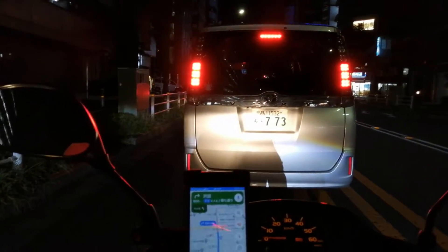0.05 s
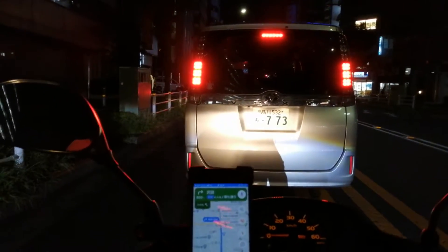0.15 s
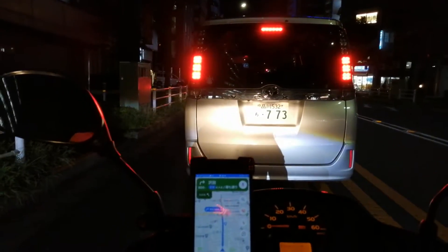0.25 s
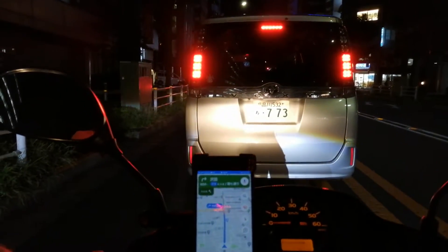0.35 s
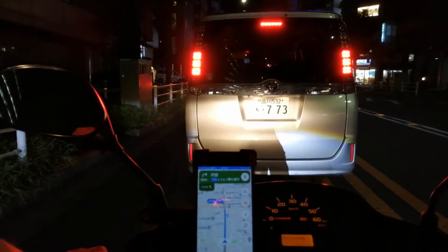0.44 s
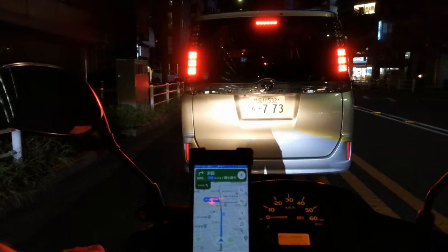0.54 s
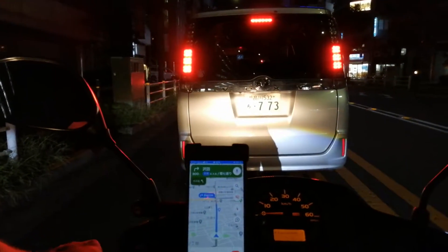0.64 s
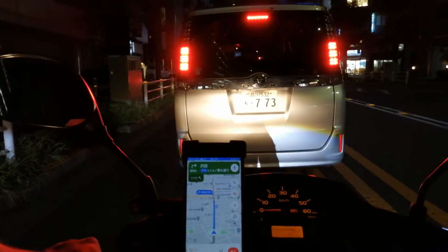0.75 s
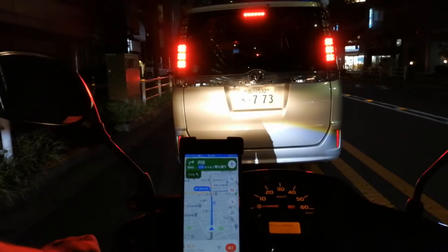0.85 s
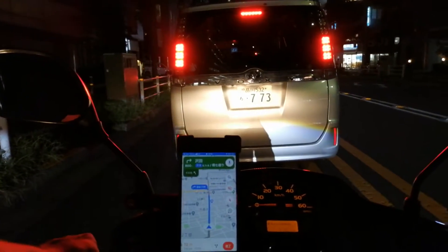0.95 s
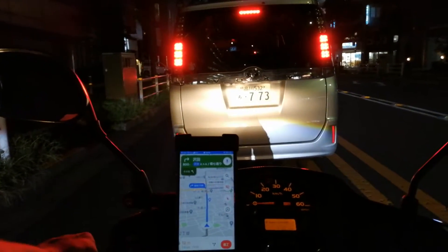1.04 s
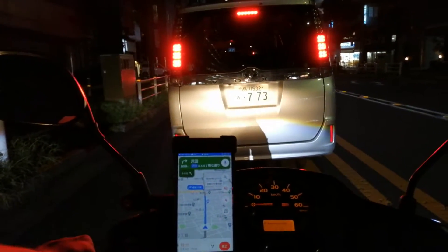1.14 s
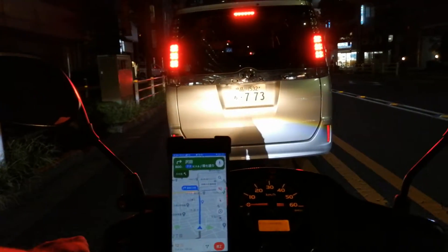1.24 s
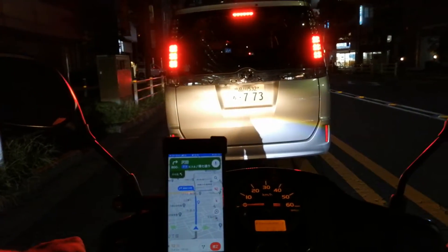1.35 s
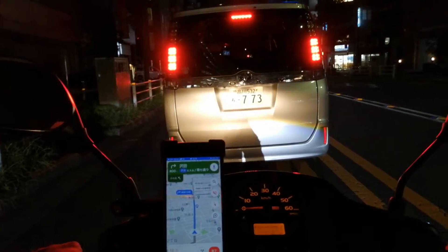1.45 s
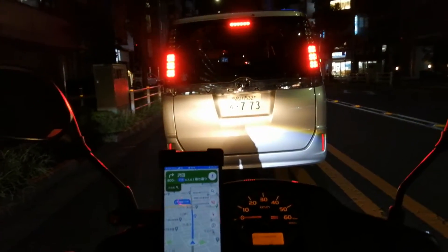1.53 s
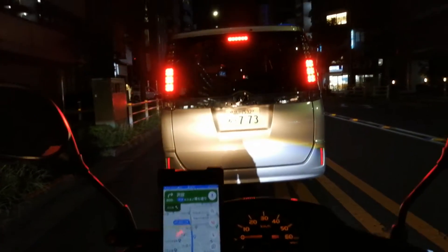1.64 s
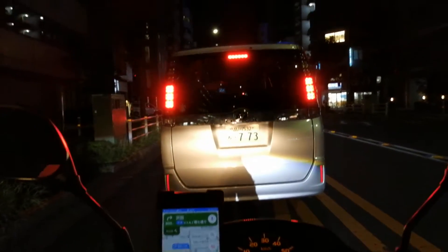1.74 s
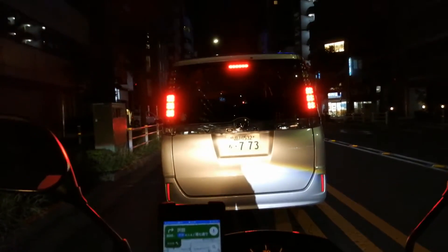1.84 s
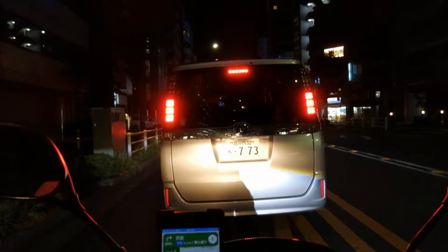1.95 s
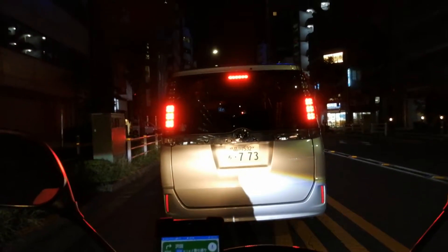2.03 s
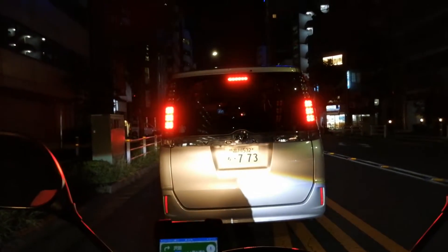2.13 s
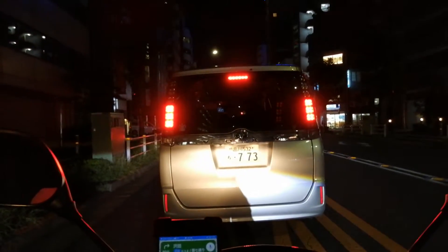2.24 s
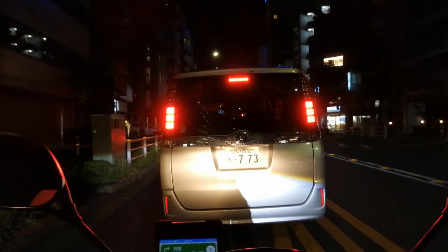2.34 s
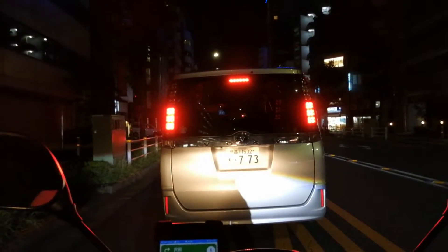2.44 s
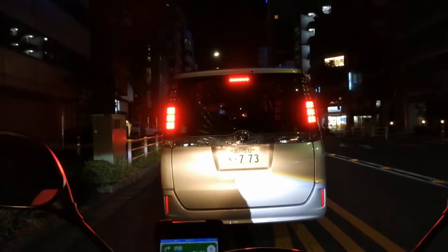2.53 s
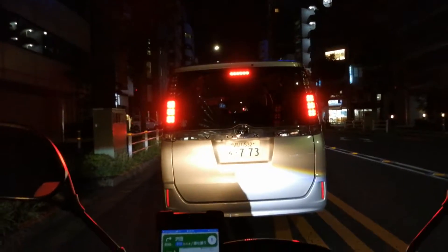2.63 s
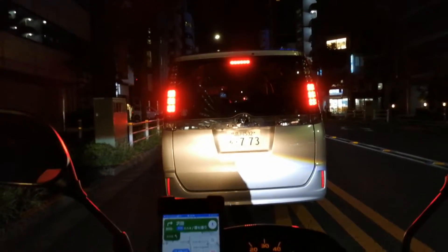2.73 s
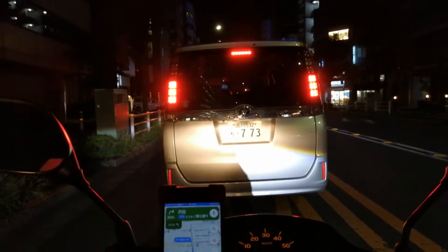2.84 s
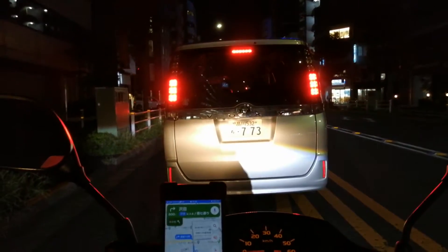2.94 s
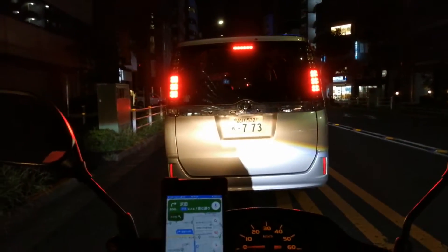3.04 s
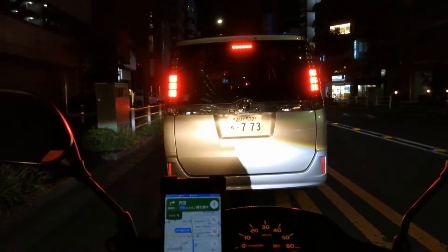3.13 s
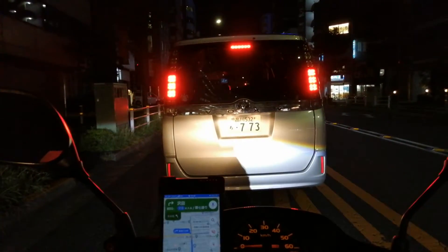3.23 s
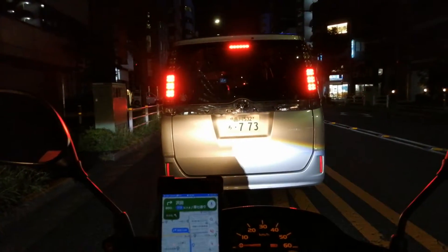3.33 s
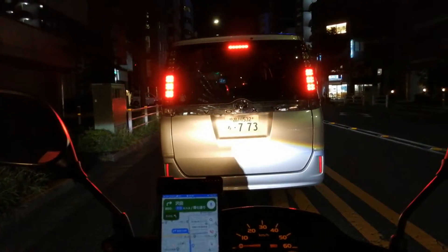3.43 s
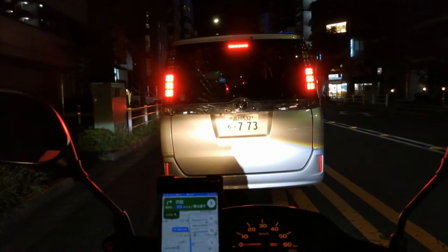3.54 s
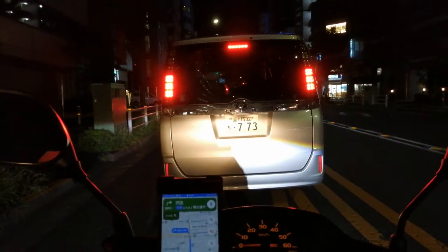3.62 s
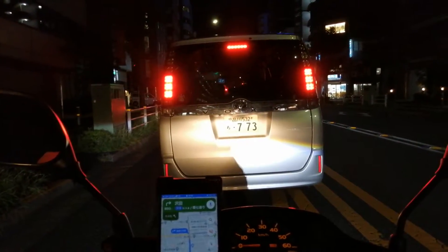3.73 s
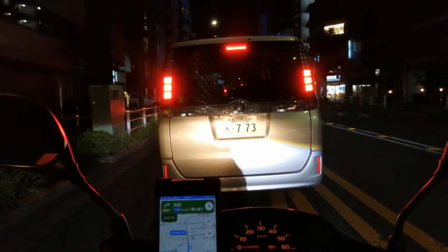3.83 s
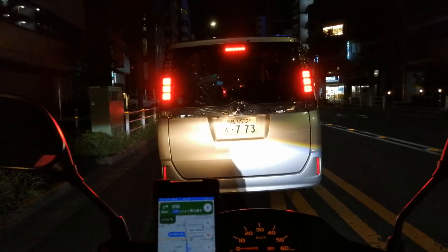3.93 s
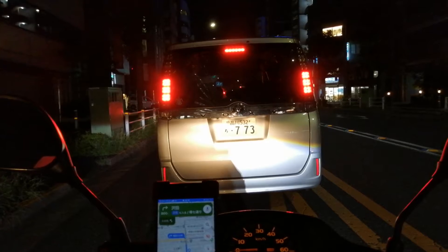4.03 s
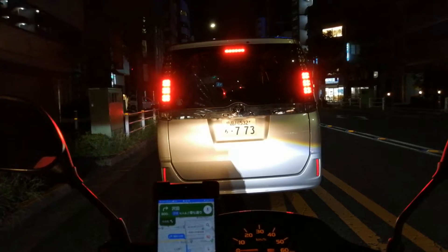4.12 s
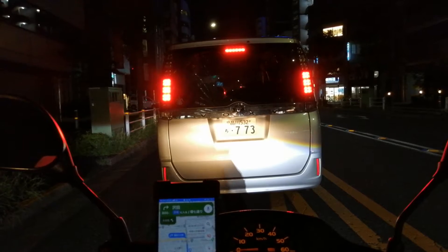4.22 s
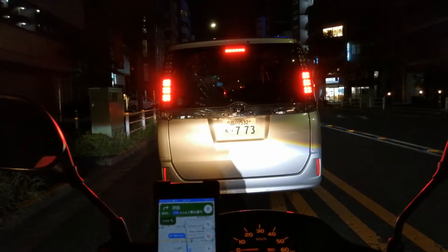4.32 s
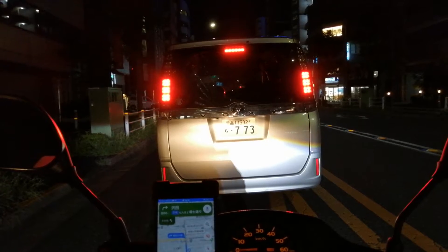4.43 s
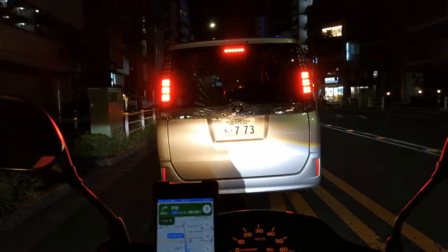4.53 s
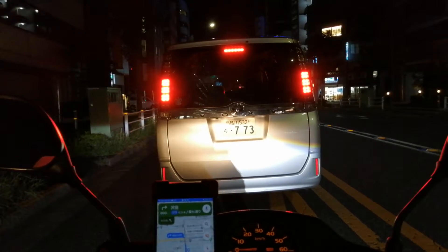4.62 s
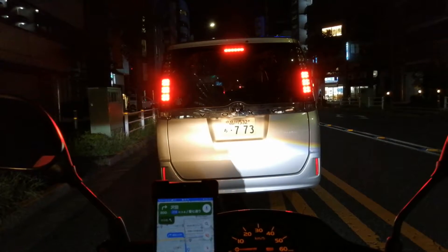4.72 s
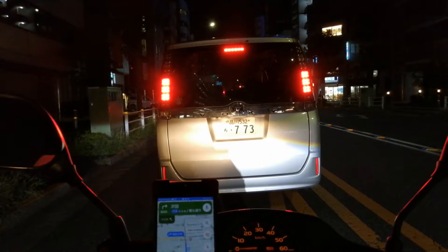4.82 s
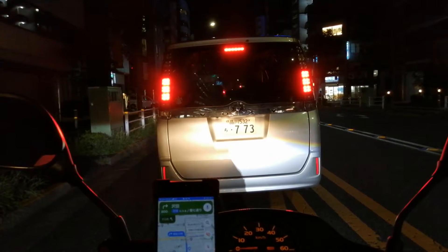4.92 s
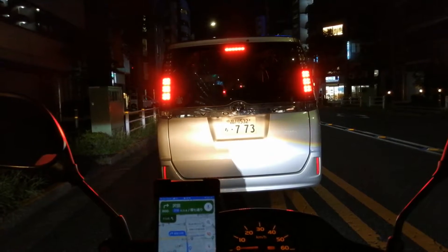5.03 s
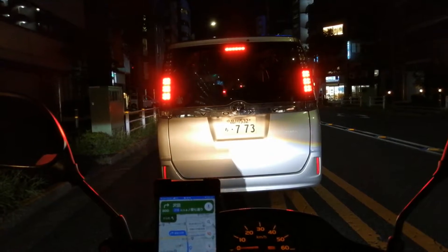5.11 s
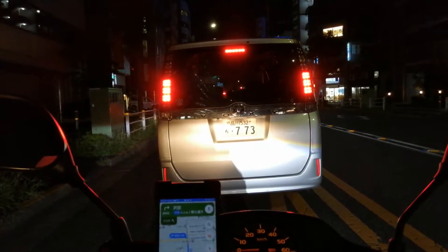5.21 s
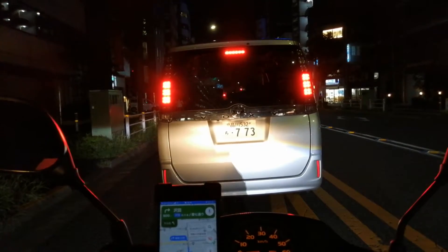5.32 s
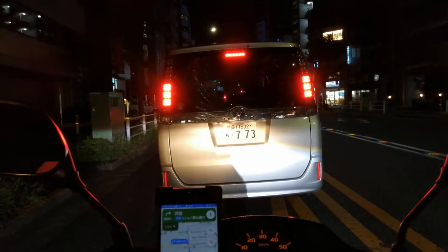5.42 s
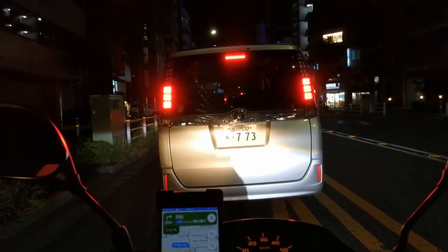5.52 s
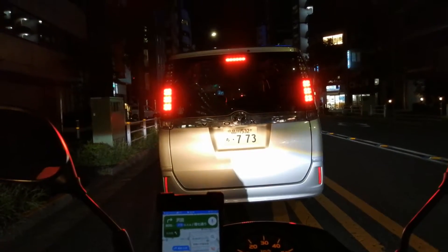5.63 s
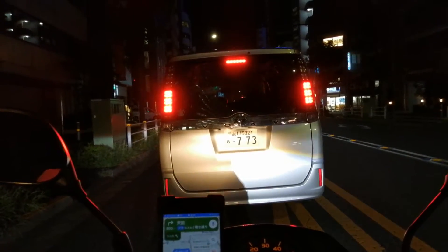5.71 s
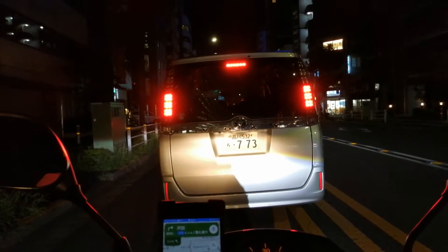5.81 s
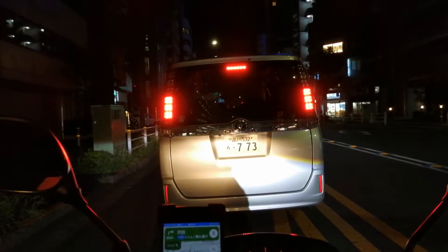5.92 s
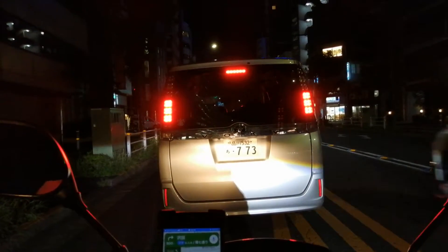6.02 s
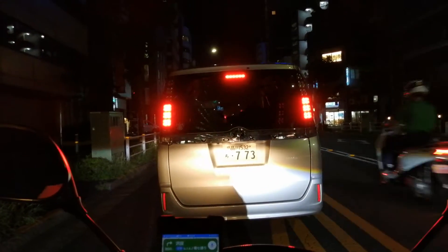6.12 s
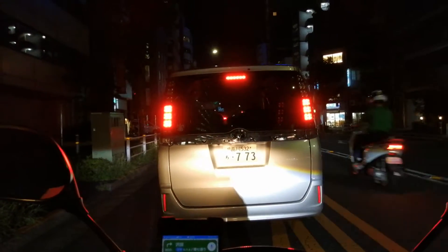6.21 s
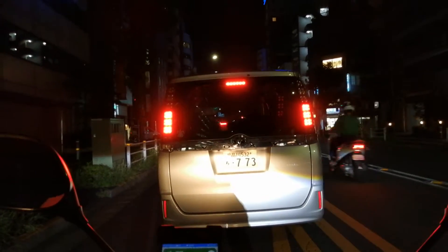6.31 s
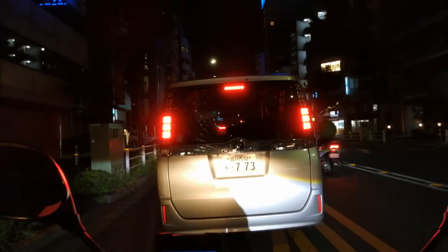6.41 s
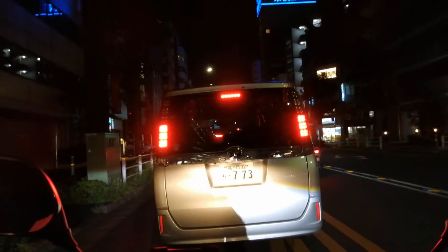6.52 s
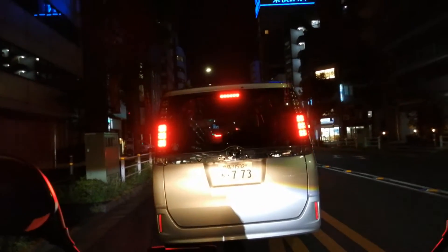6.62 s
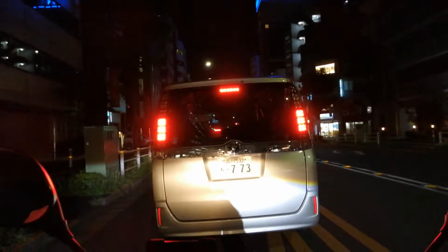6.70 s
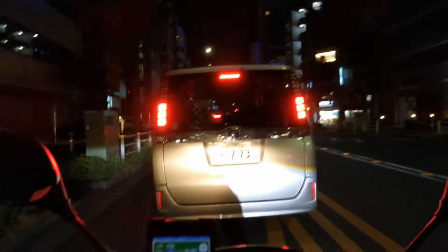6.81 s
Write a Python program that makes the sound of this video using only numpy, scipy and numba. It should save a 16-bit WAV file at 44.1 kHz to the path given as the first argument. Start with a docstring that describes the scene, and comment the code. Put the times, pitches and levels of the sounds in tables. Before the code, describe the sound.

A single-cylinder motorcycle idles with a low throb and metallic ticking while a scooter approaches, buzzes loudly past close by, and quickly fades ahead.

```python
"""A single-cylinder motorcycle idles at a red light: pulse trains for the throb, ringing noise for the case.
A scooter comes up from behind, passes close and slips behind the car in front: overtones of its
firing rate plus bands of flickering noise.
The helmet is bumped, brushed and scraped, and the idling exhaust pops: short pulses and noise bursts.
A breeze and night traffic fill the background: coloured noise."""
import sys
import numpy as np
from scipy import signal
from scipy.fft import rfft, irfft, next_fast_len
from scipy.io import wavfile
from scipy.ndimage import uniform_filter1d
from numba import njit

SR = 44100
rng = np.random.default_rng(int(sys.argv[2]) if len(sys.argv) > 2 else 0)


def store_wav(level_fs):
    """Save 16-bit WAV to argv[1]."""
    pcm = np.round(np.clip(np.atleast_2d(level_fs), -1, 1) * 32767)
    wavfile.write(sys.argv[1], SR, pcm.T.astype(np.int16))


N = 302526
TIME = np.arange(N) / SR


def undb(db):
    """Amplitude factor of a level in dB."""
    return np.exp(np.asarray(db) * (np.log(10) / 20))


def unit(x):
    """Scale to rms 1."""
    return x / np.sqrt(np.mean(x ** 2))


def noise():
    """White noise, rms near 1."""
    return rng.standard_normal(N)


def columns(table):
    """Each column of a curve after t, one value a sample."""
    s, *rest = np.transpose(table)
    return [np.interp(TIME, s, c) for c in rest]


def gate(table, fade_s):
    """1 while the curve lasts, fading to silence outside."""
    return np.clip(np.minimum(TIME - table[0][0], table[-1][0] - TIME) / fade_s + 1, 0, 1)


def bouts(rows, floor_db):
    """Steady floor gain plus a Gaussian swell per row (t/s, 1/e half-length/s, added gain/dB)."""
    return undb(floor_db) + sum(undb(db) * np.exp(-((TIME - s) / length) ** 2) for s, length, db in rows)


def late(curve, s):
    """The curve, s seconds later."""
    return np.interp(TIME - s, TIME, curve)


def walk(rate_hz):
    """Random levels held 1 / rate_hz s and slewed twice; spread near 1."""
    held = np.repeat(rng.standard_normal(int(TIME[-1] * rate_hz) + 2), repeats=16)
    slewed = uniform_filter1d(uniform_filter1d(held, size=16), size=16)
    return 1.3 * np.interp(TIME * rate_hz * 16, np.arange(len(slewed)), slewed)


def band(x, hz, width_hz):
    """Two-pole resonance, gain 1 at the centre."""
    return signal.lfilter(*signal.iirpeak(hz, hz / width_hz, SR), x)


def buzz(x, hz, width_hz):
    """Steep resonance: the same filter twice, width_hz per pass."""
    return band(band(x, hz, width_hz), hz, width_hz)


@njit
def swept(x, hz, width_hz):
    """State-variable band-pass whose centre moves."""
    y, b, l = np.empty(len(x)), 0., 0.
    for i in range(len(x)):
        g, k = np.tan(np.pi * hz[i] / SR), width_hz / hz[i]
        v = (b + g * (x[i] - l)) / (1 + g * (g + k))
        b, l, y[i] = 2 * v - b, l + 2 * g * v, k * v
    return y


def glide(x, hz, width_hz):
    """Steep moving resonance: the same filter twice, width_hz per pass."""
    return swept(swept(x, hz, 1. * width_hz), hz, 1. * width_hz)


def hiss(points, lo_hz, hi_hz, flicker_db):
    """Noise coloured by points (f/Hz, density/dB), in half-octave bands that flicker alone; rms 1."""
    size = next_fast_len(N, True)
    hz = np.maximum(np.fft.rfftfreq(size, 1 / SR), 1)
    f, db = np.transpose(points)
    tones = rfft(rng.standard_normal(size)) * undb(np.interp(np.log(hz), np.log(f), db))
    tones = tones.astype(np.complex64)
    half_octaves = (2 * np.log2(hz)).astype(np.float32)
    out = 0
    for step in np.arange(2 * np.log2(lo_hz), 2 * np.log2(hi_hz)):
        share = np.clip(1 - abs(half_octaves - np.float32(step)), 0, 1)
        out = out + undb(flicker_db * walk(9)) * irfft(tones * share, size)[:N]
    return unit(out)


def clicks(turns, scatter_db):
    """A click at each whole turn, of uneven size."""
    out = np.zeros(N)
    at = np.flatnonzero(np.diff(np.floor(turns))) + 1
    out[at] = undb(scatter_db * rng.standard_normal(N // 100)[:len(at)])
    return out


# traffic spectrum: f/Hz, relative density/dB
TRAFFIC_COLOUR = [(71, -40.5), (120, -24.5), (232, -3.5), (274, -16), (307, -4.5), (399, -15), (510, -14),
                  (1100, -23.5), (1230, -24), (1970, -30), (10700, -66), (13900, -101), (22000, -120)]
TRAFFIC_DB = -49.5


def traffic():
    """Distant traffic: coloured noise with a slowly wandering level."""
    return hiss(TRAFFIC_COLOUR, 100, 12000, 1.6) * undb(1.2 * walk(5)) * undb(TRAFFIC_DB)


# gusts: t/s, 1/e half-length/s, added gain/dB
GUST_BOUTS = [(0.5, 0.099, -33), (4.7, 0.23, -44), (6.3, 0.54, -33.5), (6.86, 0.1, -28)]
BREEZE_FLOOR_DB = -31


def breeze():
    """Wind rumbling on the microphone: low noise that swells in gusts."""
    rumble = hiss([(10, -21.5), (24, -1.5), (45, -8), (90, -21), (200, -27)], 10, 200, 3.8)
    return rumble * bouts(GUST_BOUTS, BREEZE_FLOOR_DB)


# dull bumps on the helmet and a few sharp exhaust pops of the idling engine:
# t/s, gain/dB, step/ms, fade/ms
BUMPS_AND_POPS = [(0.015, -20, 1.1, 2.7), (0.043, -27.5, 1.2, 2.3), (0.445, -25.5, 0.49, 5.8),
                  (0.479, -28, 1.3, 4.1), (0.542, -33, 1.2, 2.2), (0.5538, -20, 0.92, 2),
                  (0.571, -26.5, 0.81, 3.5), (0.604, -27, 1.5, 3.1), (0.6656, -25.5, 1.6, 2.1)]


def bumps_and_pops():
    """Helmet bumps and exhaust pops: a dip, a sudden step up and a short low shudder."""
    out, shudder = 0, unit(buzz(noise(), 236, 195))
    for s, db, step_ms, fade_ms in BUMPS_AND_POPS:
        t = TIME - s
        swing = np.tanh(1000 * t / step_ms) * np.exp(-(1000 * t / fade_ms) ** 2)
        swing += 0.092 * shudder * np.exp(-np.where(t < 0, (t / 0.01) ** 2, t / 0.022))
        out = out + undb(db) * swing
    return out


# cloth strokes: t/s, 1/e half-length/s, dull rub level/dB, crisp edge level/dB
CLOTH_STROKES = [(0.0, 0.11, -66, -66), (0.206, 0.17, -58, -86), (0.516, 0.12, -58.5, -79),
                 (0.606, .06, -66, -69.5), (0.8, 0.24, -61, -82)]


def cloth():
    """Cloth brushing the shell: a dull and a crisp noise band, swelling per stroke."""
    rub = hiss([(800, -16), (1300, -6), (2000, -5.5), (2800, -16), (3700, -12), (4300, -27)], 780, 4300, 3.3)
    edge = hiss([(3500, -2.5), (6500, -3.0), (8500, -14), (11000, -41)], 3200, 11000, 2.6)
    rows = np.array(CLOTH_STROKES)
    return rub * bouts(rows[:, [0, 1, 2]], -np.inf) + edge * bouts(rows[:, [0, 1, 3]], -np.inf)


# strap scrape: t/s, f/Hz, level/dB
STRAP_SCRAPE = [(0.4, 1500, -71), (0.44, 1450, -62), (0.49, 1340, -55), (0.57, 1290, -53), (0.6, 1600, -59),
                (0.645, 1700, -57), (0.69, 1650, -70)]


def strap():
    """A strap scrapes the shell: noise through a gliding resonance."""
    hz, db = columns(STRAP_SCRAPE)
    return unit(glide(noise(), hz, 420)) * undb(db) * gate(STRAP_SCRAPE, .02)


def overtone(turns, order, wander_db):
    """One multiple of the firing rate; echoes from cars and walls make it swell and slip."""
    slip = 0.00081 * order ** 2 * walk(11)
    return undb(wander_db * walk(7)) * np.cos(2 * np.pi * (order * turns + rng.random() + slip))


# spectrum of the scooter's noise: f/Hz, relative density/dB
WHOOSH_COLOUR = [(150, -39.5), (250, -13), (327, -5), (353, -3), (515, -7), (683, -15), (1010, -12),
                 (1340, -16), (1550, -18), (2370, -22), (2810, -24.5), (3730, -35.5), (6070, -46),
                 (7690, -48.5), (10700, -72), (13900, -103), (22000, -120)]
# body panels: f/Hz, width per filter pass/Hz, base level/dB, swell t/s, 1/e half-length/s, added gain/dB
FAIRING_RINGS = [(1040, 110, -15, 3.8, 0.098, 14.5), (1052, 58, -19.5, 5.85, .067, 4),
                 (1554, 80, -19, 2.6, .09, 17.5), (1557, 410, -15.5, 6.04, 0.04, 20.5),
                 (1650, 130, -15.5, 6.16, 0.054, 16.5), (1510, 330, -19.5, 11, 0.14, 17),
                 (1830, 310, -13, 6.42, 0.045, 6), (1862, 180, -15, 4.5, .12, 12.5),
                 (1993, 140, -16, 6.4, 0.087, 10), (2350, 100, -24.5, 4.62, 0.11, 20.5),
                 (2613, 82, -18.5, 4.66, 0.074, 16.5), (3134, 74, -16.5, 4.55, .1, 7),
                 (3980, 200, -21, 5.15, .067, 6.5), (3900, 150, -25.5, 5.2, .04, 12),
                 (4600, 180, -24.5, 6.3, .09, 14.5), (5730, 78, -23.5, 6.38, .07, 17.5),
                 (4760, 90, -23, 4.5, .067, 18)]


def rush_range(lo_hz, hi_hz):
    """One range of the scooter's rush, with the body panels that ring in it; rms 1."""
    air = hiss(WHOOSH_COLOUR, lo_hz, hi_hz, 2.05)
    out = air
    for hz, width_hz, db, s, length_s, swell_db in FAIRING_RINGS:
        if lo_hz < hz < hi_hz:
            gain = undb(db + 1.8 * walk(4.31)) * bouts([(s, length_s, swell_db)], 0)
            # a narrow ring passes little of the noise: lift it
            out = out + gain * np.sqrt(lo_hz / width_hz) * buzz(air, hz, width_hz)
    return unit(out)


def hollow(table, width_hz, rush_db):
    """Noise through a gliding resonance, riding on the level of the rush."""
    hz, db = columns(table)
    return unit(glide(noise(), hz, width_hz)) * undb(rush_db + db) * gate(table, .1)


SPIT_S, SPIT_LENGTH_S, SPIT_DB = 6.27, .16, -65.5
SPIT_DECAY_CYCLES = .16


def scooter_spit(turns):
    """One bout of treble noise that bursts and decays at every firing."""
    air = hiss([(6000, -3), (9000, 0), (11000, -14), (14500, -30)], 6000, 14500, 1.5)
    spit = np.exp(-(turns % 1) / SPIT_DECAY_CYCLES) * undb(3 * walk(40)) * air
    return unit(spit) * bouts([(SPIT_S, SPIT_LENGTH_S, SPIT_DB)], -np.inf)


# rush, from tyres over belt and gas to air:
# low f/Hz, high f/Hz, offset from the rush level/dB, share following the treble/1, delay/s
RUSH_RANGES = [(653.1, 1300, -1, 0.06, -0.056), (1310, 2300, -4, 0.12, 0.029),
               (2310, 4300, -4.5, 0.36, -0.015), (4170, 7000, 1, 1, -0.015),
               (6900, 13000, -6.5, 1.08, -.01)]
# hollow note that glides as the echoes shift: t/s, f/Hz, level over the rush/dB
HOLLOW_NOTE = [(3.95, 1000, -12), (4.1, 875, 7.5), (4.25, 590, 7), (4.33, 917, -3), (4.5, 1013, -2.5),
               (4.75, 1050, -5.5), (4.85, 885, -20), (5.15, 1040, -2), (5.4, 914, -12.5), (5.55, 792, -0.5),
               (5.7, 1110, -6.5), (5.98, 1283, -7.5), (6.07, 1070, -6), (6.17, 965, -3.5), (6.3, 935, -8.5),
               (6.48, 1050, -5), (6.7, 1004, -23)]
# brighter hollow note: t/s, f/Hz, level over the rush/dB
BRIGHT_NOTE = [(4.3, 2980, -25), (4.9, 3110, -28), (5.2, 3040, -21.5), (5.6, 3130, -29), (5.8, 3060, -16),
               (5.87, 3160, -10.5), (5.97, 2980, -17), (6.04, 2950, -24.5), (6.1, 2720, -38),
               (6.17, 2700, -14), (6.3, 2830, -15.5), (6.4, 2830, -25), (6.6, 2500, -15)]
HOLLOW_WIDTH_HZ, BRIGHT_WIDTH_HZ = 227, 350  # per filter pass


def scooter_rush(turns, rush_db, treble_db):
    """Tyres, belt, gas and air: grainy noise with a slight throb at the firing rate."""
    rush = 0
    for lo_hz, hi_hz, db, share, delay_s in RUSH_RANGES:
        level_db = db + late(rush_db + share * (treble_db - rush_db), delay_s)
        rush = rush + rush_range(lo_hz, hi_hz) * undb(level_db)
    rush = rush + hollow(HOLLOW_NOTE, HOLLOW_WIDTH_HZ, rush_db)
    rush = rush + hollow(BRIGHT_NOTE, BRIGHT_WIDTH_HZ, rush_db)
    sputter = undb(0.83 * walk(70) + 0.5 * walk(4.8))
    throb = 1 + 0.1 * np.cos(2 * np.pi * turns)
    return (rush * sputter + scooter_spit(turns)) * throb


# drone: t/s, rms level/dB of the 2nd, 3rd, 4th, 5th and 6th multiple of the firing rate
DRONE_LEVELS = [(4.8, -51, -50, -66, -62, -67), (5.05, -39, -38.5, -52, -57, -59),
                (5.28, -34.5, -33.5, -39.5, -52, -54), (5.42, -38, -44, -52, -55, -58),
                (5.52, -37.5, -32.5, -49.5, -41, -47), (5.76, -30.5, -33.5, -44, -40, -43),
                (6.0, -27, -23.5, -27, -26.5, -25.5), (6.2, -27.5, -35.5, -25.5, -31.5, -34),
                (6.46, -37.5, -44, -32.5, -46, -48), (6.6, -41, -49, -50, -53, -50)]


def scooter_drone(turns):
    """Low drone, heard only near by: the lowest overtones of the firing rate."""
    levels = enumerate(columns(DRONE_LEVELS), start=2)
    drone = sum(np.sqrt(2) * undb(db) * overtone(turns, order, 1.3) for order, db in levels)
    return drone * gate(DRONE_LEVELS, .1)


# muffler response: f/Hz, gain/dB
MUFFLER_GAIN = [(285, -9.5), (330, -1), (400, -3.5), (460, -7.5), (530, -5), (640, -9.5), (800, -15),
                (1000, -16), (1250, -20.5)]
# lifts by echoes from road and cars: t/s, f/Hz, lift/dB, f/Hz, lift/dB, f/Hz, lift/dB
ECHO_LIFTS = [(2.9, 378, -1.5, 502, 6.5, 1010, -4.5), (3.05, 363, -3, 510, 13, 997, -1.5),
              (3.11, 357, 15.5, 537, 5, 1003, 1), (3.18, 278, 17.5, 530, -2.5, 1007, -1),
              (3.27, 405, 8, 498, 17.5, 1000, 0.5), (3.33, 407, -3.5, 534, 12.5, 996, 1.5),
              (3.43, 357, 1, 490, 17, 1003, -0.5), (3.5, 326, 18.5, 505, -3, 1003, 1),
              (3.62, 403, 5.5, 492, 6, 1000, 0), (3.75, 337, 11.5, 512, 4, 1013, 1.5),
              (4.1, 345, 22, 518, 1.5, 900, 4.5), (4.3, 375, 14, 514, 3, 966, 0.5),
              (4.5, 358, 10, 496, -8.5, 1050, 18.5), (4.7, 379, 10, 507, -2, 1076, 6.5),
              (4.85, 411, 16, 513, 4, 886, 2), (5.0, 396, 9.5, 516, 6.5, 893, -3),
              (5.15, 357, 10, 536, 12.5, 1040, 9.5), (5.36, 384, 14.5, 517, 12, 897, -4),
              (5.5, 405, -1, 504, 5.5, 813, 6), (5.66, 353, -2, 500, 10, 803, 12),
              (5.72, 392, 11.5, 577, 14.5, 806, 7.5), (5.77, 359, 14.5, 545, 7.5, 790, 1),
              (5.83, 389, 14.5, 535, 12.5, 778, 4.5), (5.96, 379, 11.5, 540, 14.5, 844, 5),
              (6.05, 319, 12, 481, 6.5, 785, 4.5), (6.14, 315, 14, 462, 13, 640, 5.5),
              (6.22, 307, 14.5, 454, 13, 640, 14.5), (6.42, 309, 13, 454, 6.5, 624, 11),
              (6.55, 324, 7, 450, -4, 624, -3)]
# notes that clear and blur: t/s, gain of the notes ahead of the exhaust's noise/dB
NOTE_CLARITY = [(2.9, -2.5), (3.55, -2), (4.2, -3), (4.4, 2.5), (4.75, -3), (5.3, -2.5), (5.5, -3.5),
                (5.7, 0), (6.45, -1.5), (6.6, -12)]


def scooter_exhaust(turns, firing_hz):
    """Even firings sing through the muffler: overtones shaped by it and by echoes, plus noise; rms 1."""
    lifts = columns(ECHO_LIFTS)
    f, db = np.transpose(MUFFLER_GAIN)
    notes, power = 0, 0
    for order in range(6, 26):
        hz = order * firing_hz
        lift_db = sum(up_db * np.exp(-((hz - loud_hz) / 38) ** 2)
                      for loud_hz, up_db in zip(lifts[::2], lifts[1::2]))
        gain = undb(np.interp(np.log(hz), np.log(f), db) + lift_db)
        notes = notes + gain * overtone(turns, order, 2.3)
        power = power + gain ** 2 / 2
    notes = notes / np.sqrt(power) * undb(columns(NOTE_CLARITY)[0])
    return unit(notes + 0.55 * hiss(WHOOSH_COLOUR, 250, 650, 1.5))


def scooter_tyres():
    """Low tyre rumble, plain noise that fades in as the scooter nears."""
    rumble = hiss([(60, -2.0), (100, -1.5), (270, -2.5)], 72, 270, 0.83)
    return undb(-12.5) * rumble * np.clip((TIME - 4.6) / .2, 0, 1)


# firing rate as heard: t/s, f/Hz
FIRING_RATE = [(2.9, 45.85), (3.45, 45.2), (3.9, 48.14), (4.35, 50.17), (4.84, 50.3), (5.1, 52.31),
               (5.4, 50.34), (5.63, 48.93), (5.8, 48.38), (5.98, 47.43), (6.2, 45.7), (6.5, 44.72),
               (6.86, 44.64)]
# levels as heard: t/s, exhaust level/dB, rush level/dB, treble level of the rush/dB
SCOOTER_LEVELS = [(2.9, -58, -61, -98), (3.05, -47, -64, -90), (3.11, -44.5, -67, -90),
                  (3.2, -49, -77, -96), (3.3, -46.5, -68, -92), (3.42, -48.5, -58, -88),
                  (3.5, -46.5, -57, -84), (3.58, -54, -63, -93), (3.72, -45, -54.5, -91),
                  (3.95, -38.5, -54, -90), (4.15, -56.5, -57, -84), (4.33, -39, -50, -84),
                  (4.42, -38, -45, -77), (4.52, -37.5, -43, -71.5), (4.66, -37.5, -45, -68.5),
                  (4.76, -44.5, -42, -79.5), (4.86, -31.5, -48, -80.5), (5.0, -35, -40, -69.5),
                  (5.15, -28.5, -35, -70.5), (5.4, -28, -31.5, -63.5), (5.65, -26.5, -26.5, -56.5),
                  (5.79, -19, -25, -45.5), (5.92, -20.5, -21.5, -42), (6.05, -18, -21, -40.5),
                  (6.2, -20.5, -22, -44), (6.31, -24.5, -23, -49), (6.42, -23.5, -23, -49.5),
                  (6.48, -33, -25.5, -57), (6.55, -32.5, -28, -58), (6.63, -37, -34.5, -59.5),
                  (6.7, -38.5, -36.5, -63), (6.77, -38, -39, -64), (6.86, -47, -44.5, -74)]


def scooter():
    """Exhaust, rush and drone follow one firing rate; tyre rumble is plain noise; curves set the loudness."""
    firing_hz = columns(FIRING_RATE)[0]
    turns = np.cumsum(firing_hz) / SR
    exhaust_db, rush_db, treble_db = columns(SCOOTER_LEVELS)
    low = (scooter_exhaust(turns, firing_hz) + scooter_tyres()) * undb(exhaust_db)
    sound = low + scooter_rush(turns, rush_db, treble_db) + scooter_drone(turns)
    return sound * gate(SCOOTER_LEVELS, 0.43)


# pressure swings of a four-stroke cycle: place in cycle/1, rise/ms, fall/ms, sign, level/dB
PRESSURE_STROKES = [(0.534, 2.2, 1, -1.01, -8), (0.585, 1.4, 1.2, 0.95, -8), (0.682, 6.26, 2.9, -0.92, 4),
                    (0.84, 2.13, 9.5, 0.85, 1)]
# idle throb: t/s, level/dB
THROB_LEVEL = [(0.0, -29), (0.3, -27), (0.55, -28), (1.03, -26.5), (1.2, -25), (1.49, -27), (1.65, -24.5),
               (2.3, -23), (4.7, -22), (4.9, -21), (5.35, -18.5), (5.9, -21), (6.05, -25.5), (6.5, -24.5),
               (6.67, -18.5), (6.86, -25.5)]
AIRBOX_HZ, AIRBOX_WIDTH_HZ = 26.8, 7.9


def engine_throb(turns):
    """Intake sucks, exhaust blows: one pressure bump per stroke and cycle, plus the airbox resonance."""
    ms, push = np.arange(-1500, 1501) * 1000 / SR, 0
    for place, rise_ms, fall_ms, sign, db in PRESSURE_STROKES:
        bump = np.exp(-.5 * (ms / np.where(ms < 0, rise_ms, fall_ms)) ** 2)
        strikes = clicks(turns - place + .012 * walk(17), 0.74)  # a little early or late
        push = push + sign * undb(db) * signal.oaconvolve(strikes, bump, "same")
    airbox = band(push, AIRBOX_HZ, AIRBOX_WIDTH_HZ)
    return unit(airbox + push - uniform_filter1d(push, size=2700)) * undb(columns(THROB_LEVEL)[0])


def rattle_noise(knocks, decay_s):
    """Noise that bursts and decays at each knock, over a steady floor."""
    tail = np.exp(-np.arange(800) / (decay_s * SR))
    return (0.27 + signal.oaconvolve(knocks, tail)[:N]) * noise()


# engine case rings: f/Hz, width per filter pass/Hz, relative gain/dB
CASE_RINGS = [(505, 68, 11), (825, 210, 5.5), (1474, 160, -2.5), (1928, 170, 2), (2593, 130, -10.5),
              (3320, 250, -16.5)]
CASE_DB = -55.5


def engine_case(rattle, extra_db):
    """Each part of the case rings alone, wandering in pitch and level; upper rings start louder."""
    case = 0
    for hz, width_hz, db in CASE_RINGS:
        gain = undb(db + 1.4 * walk(5) + extra_db * (hz > 1200))
        case = case + gain * glide(rattle, hz * (1 + .022 * walk(4)), width_hz)
    return unit(case) * undb(CASE_DB)


# loose panel: t/s, 1/e half-length/s, added gain/dB
PANEL_BOUTS = [(0.51, 0.086, -57), (1.35, 0.15, -53), (1.76, 0.091, -60.5), (1.99, 0.036, -54),
               (2.3, 0.21, -67), (2.95, 0.21, -58), (3.62, 0.057, -55.5), (4.1, 0.13, -62.5)]
PANEL_HZ, PANEL_WIDTH_HZ, PANEL_FLOOR_DB = 1071, 76, -68


def loose_panel(rattle):
    """A loose panel buzzes in bouts: rattle through a resonance of wandering pitch."""
    panel = glide(rattle + 0.4 * noise(), PANEL_HZ * (1 + .02 * walk(12)), PANEL_WIDTH_HZ)
    return unit(panel) * bouts(PANEL_BOUTS, PANEL_FLOOR_DB)


# thin case ring: t/s, 1/e half-length/s, level/dB
THIN_BOUTS = [(.88, .06, -69), (.98, .04, -72), (1.36, 0.066, -68), (1.57, 0.036, -72)]
THIN_HZ, THIN_WIDTH_HZ = 2580, 60


def thin_ring():
    """A thin ring of the case comes and goes: narrow noise in bouts."""
    return unit(buzz(noise(), THIN_HZ, THIN_WIDTH_HZ)) * bouts(THIN_BOUTS, -np.inf)


# cylinder head rings: f/Hz, width per filter pass/Hz, relative gain/dB
HEAD_RINGS = [(3880, 530, 5), (4750, 540, -6.5), (5640, 610, -6), (6800, 1000, -11)]
HEAD_DB, TICK_PLACE = -78, .825  # HEAD_DB before the early extra; place in cycle/1


def cylinder_head(turns, knocks, extra_db):
    """Bare ticks ring crisp from the cylinder head, louder at first."""
    ticks = clicks(turns - TICK_PLACE, 1.2) + .25 * knocks
    crisp = rattle_noise(ticks, decay_s=0.003)
    rings = sum(undb(db) * buzz(crisp, hz, width_hz) for hz, width_hz, db in HEAD_RINGS)
    return unit(rings) * undb(HEAD_DB + 1.4 * extra_db)


# idle speed: t/s, f/Hz (four-stroke cycles)
IDLE_RATE = [(0.0, 16.86), (0.6, 16.09), (1.2, 16.14), (1.8, 15.9), (2.4, 16.16), (3.0, 16.22),
             (3.6, 15.93), (4.2, 15.84), (4.8, 15.71), (5.4, 16.28), (6.0, 16.03), (6.86, 15.87)]
# valve gear: place in cycle/1, level/dB
TAPPET_TICKS = [(0.18, 1), (0.77, 0), (0.43, -11), (0.09, -10)]
FIRST_TURN = .614  # place in cycle at t = 0
EXTRA_DB, SETTLE_S = 5.5, .7


def motorcycle():
    """The idle cycle drives the throb; tappet knocks shake case, panel and cylinder head."""
    turns = FIRST_TURN + np.cumsum(columns(IDLE_RATE)[0]) / SR
    knocks = sum(undb(db) * clicks(turns - place, 1.8) for place, db in TAPPET_TICKS)
    rattle = rattle_noise(knocks, decay_s=0.0017)
    extra_db = EXTRA_DB * np.exp(-TIME / SETTLE_S)
    metal = engine_case(rattle, extra_db) + loose_panel(rattle) + thin_ring()
    return engine_throb(turns) + metal + cylinder_head(turns, knocks, extra_db)


# balance of the bass: t/s, left minus right/dB
BASS_BALANCE = [(0, .4), (4.8, .45), (5.2, -.3), (5.9, -.35), (5.96, 0), (6.2, 0), (6.28, -.35),
                (6.86, -.35)]


def scene():
    """All sources in mono; the bass sits slightly left, later slightly right, briefly centred."""
    background = traffic() + breeze()
    close_by = bumps_and_pops() + cloth() + strap()
    sound = background + close_by + scooter() + motorcycle()
    bass = signal.sosfilt(signal.butter(1, 450, fs=SR, output="sos"), sound)
    side = bass * (undb(columns(BASS_BALANCE)[0] / 2) - 1)
    return np.array([sound + side, sound - side])


TOP_HZ = 14800


def record(dry):
    """A faint hiss, partly each channel's own; the top is cut and both ends fade in 4 ms."""
    shared_hiss = undb(-101) * noise()
    own_hiss = undb(-96.5) * band(rng.standard_normal(dry.shape), 4300, 4000)
    ends = np.clip(np.minimum(TIME, TIME[-1] - TIME) / .004, 0, 1)
    top_cut = signal.ellip(8, .2, 70, TOP_HZ, fs=SR, output="sos")
    return ends * signal.sosfilt(top_cut, dry + shared_hiss + own_hiss)


dry = scene()
out = record(dry)
store_wav(out)
```